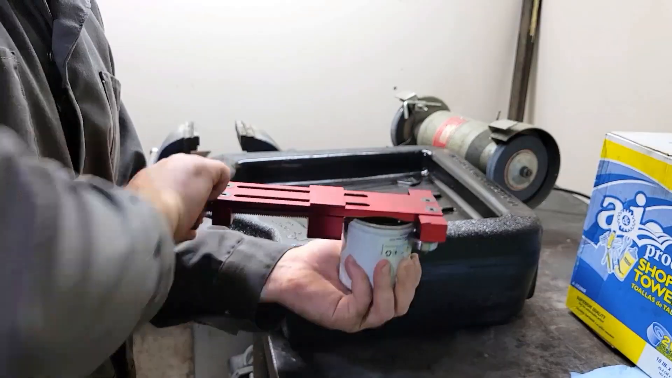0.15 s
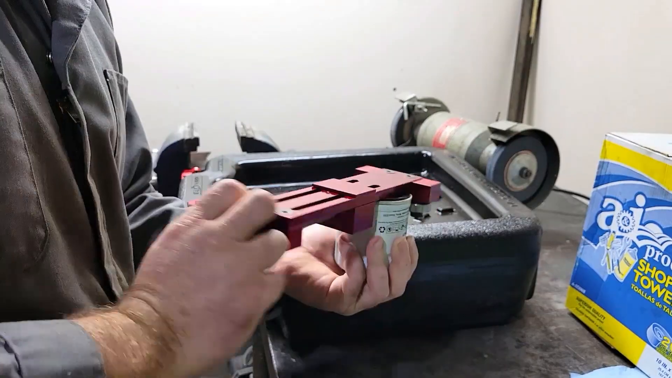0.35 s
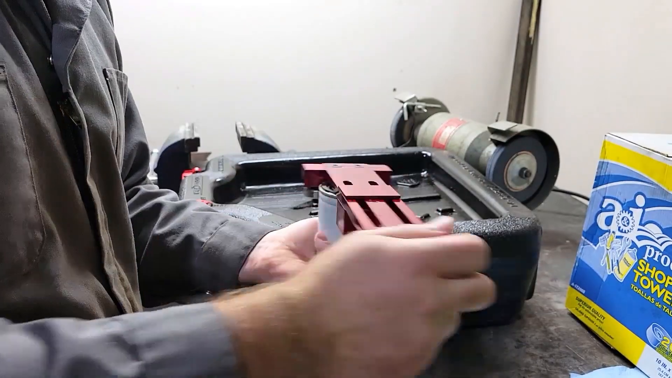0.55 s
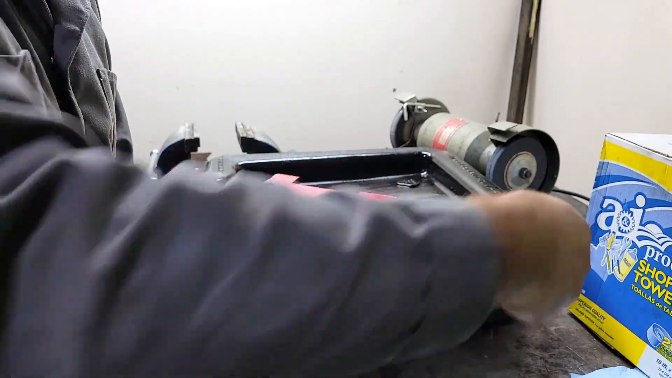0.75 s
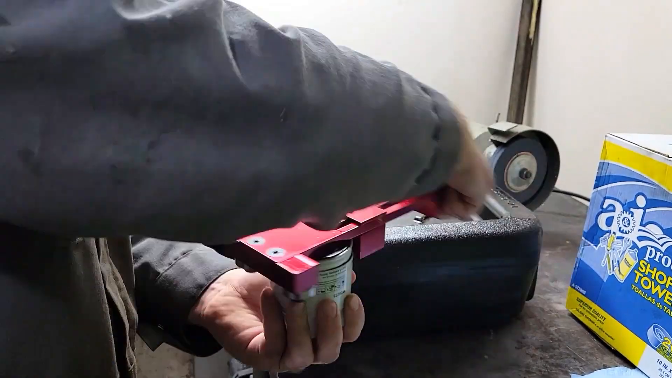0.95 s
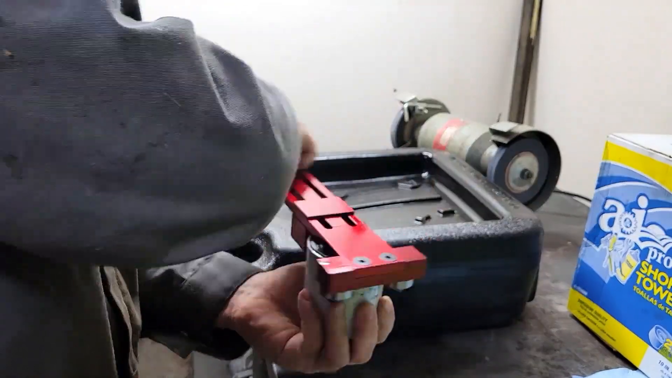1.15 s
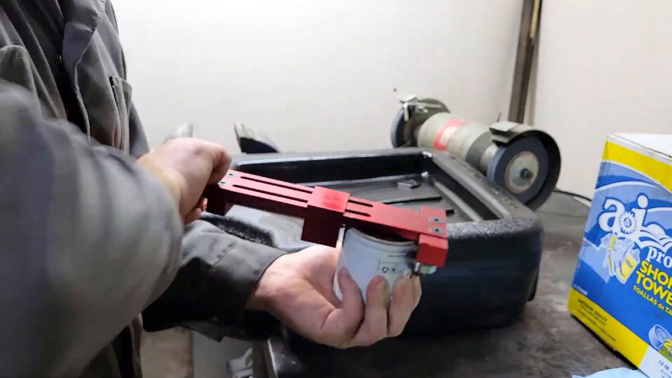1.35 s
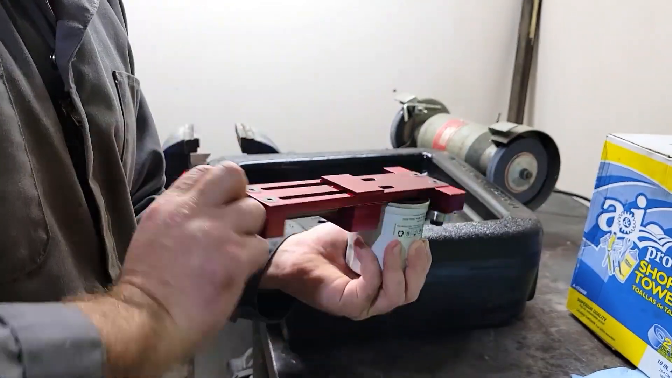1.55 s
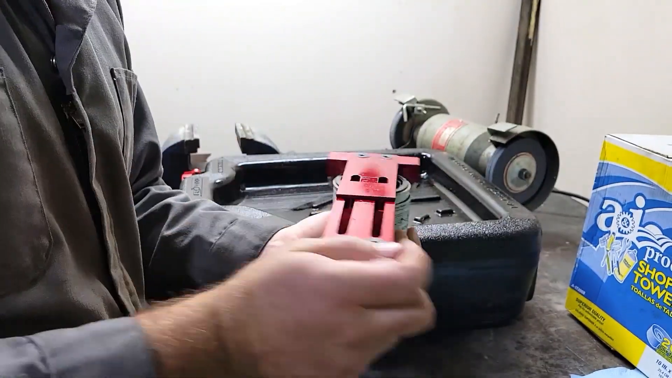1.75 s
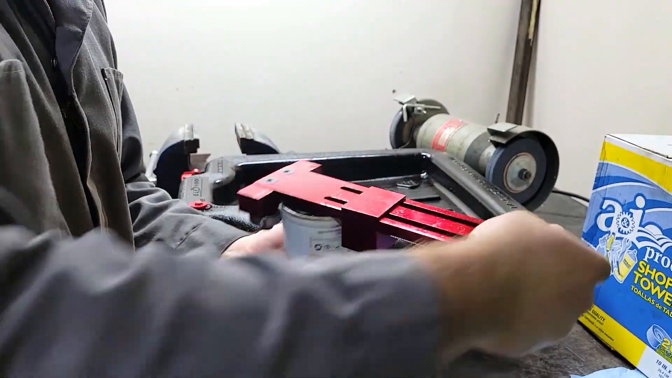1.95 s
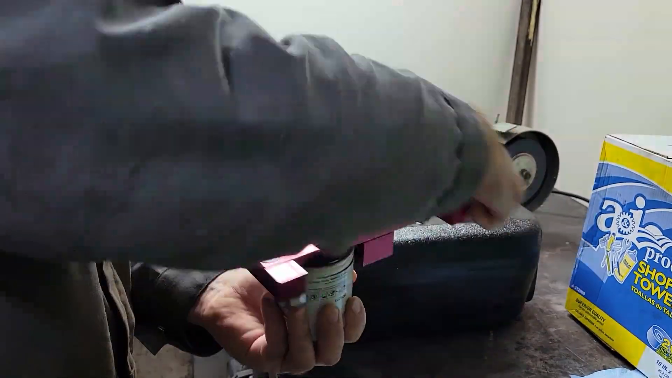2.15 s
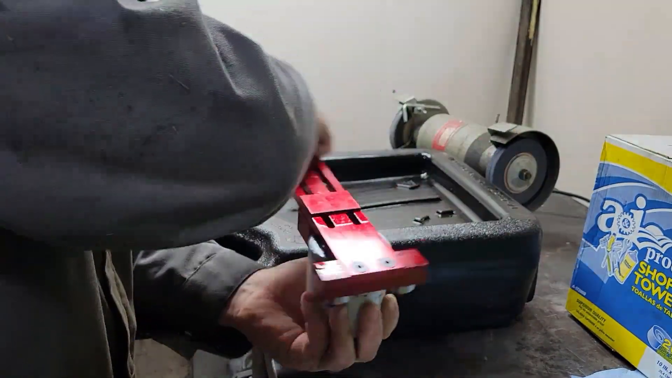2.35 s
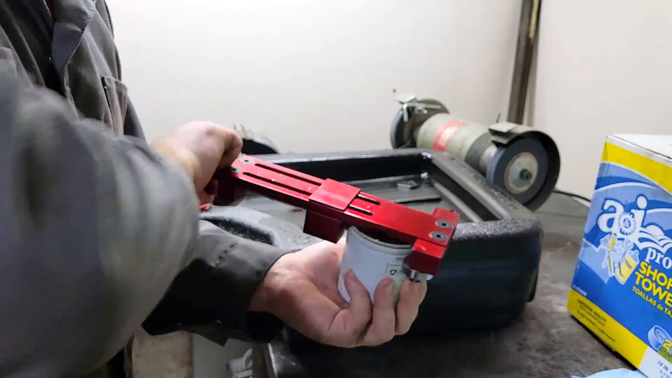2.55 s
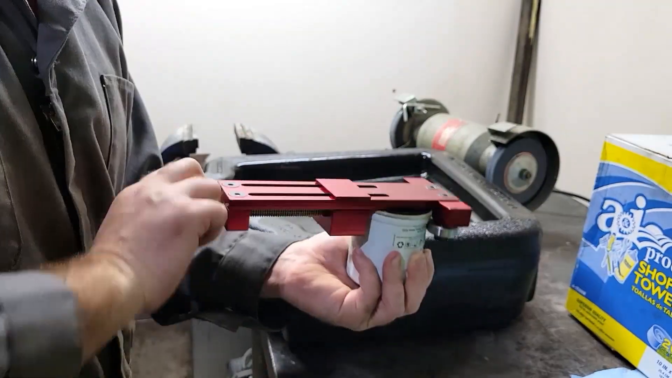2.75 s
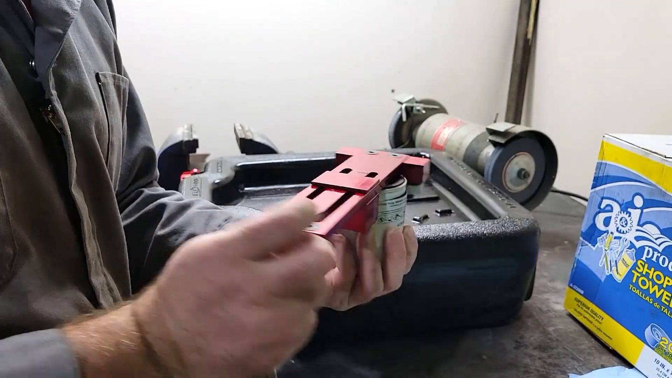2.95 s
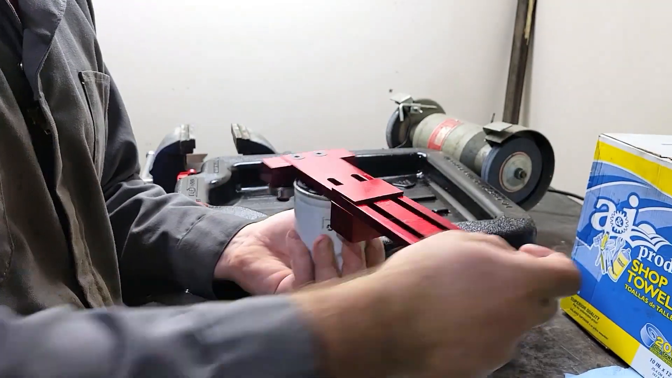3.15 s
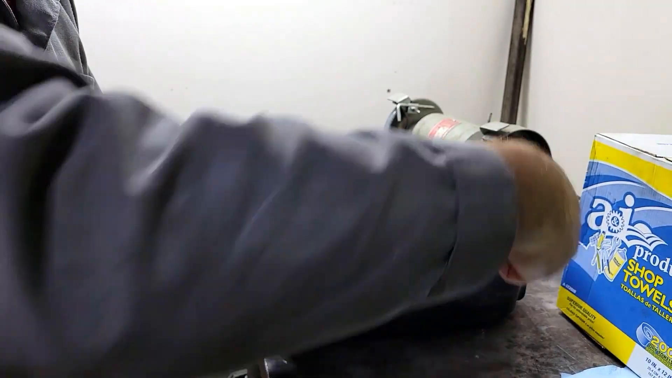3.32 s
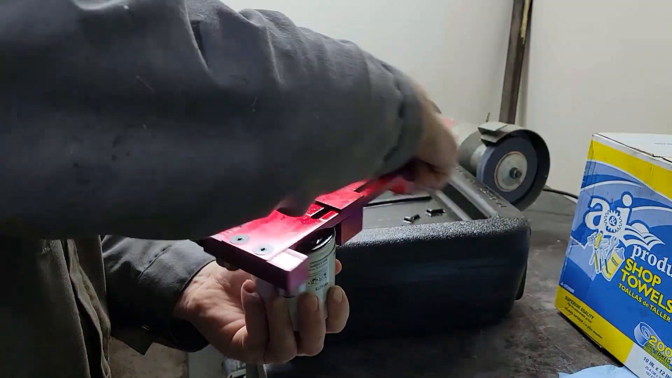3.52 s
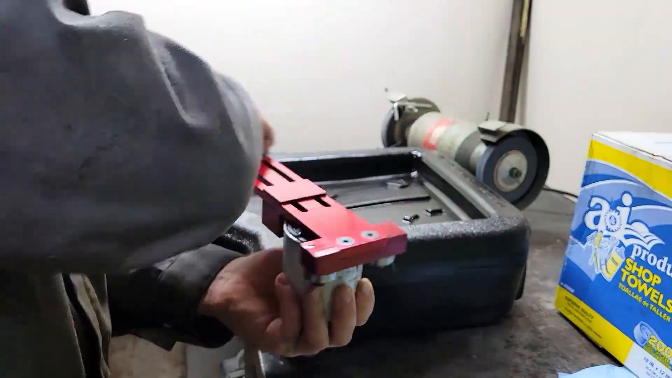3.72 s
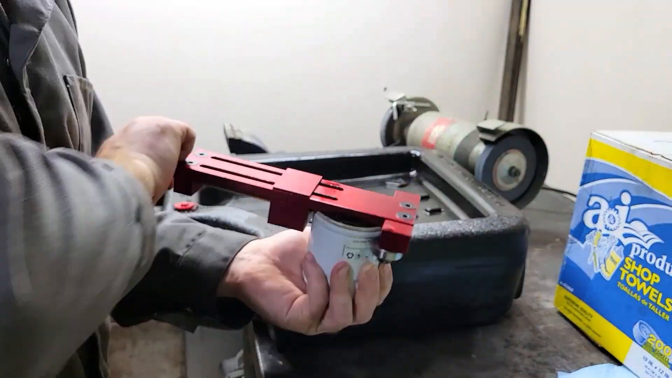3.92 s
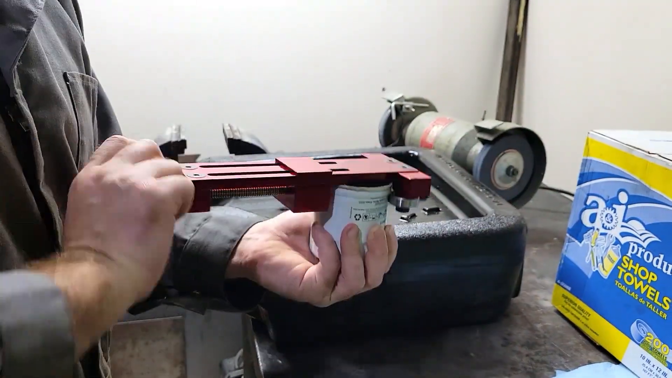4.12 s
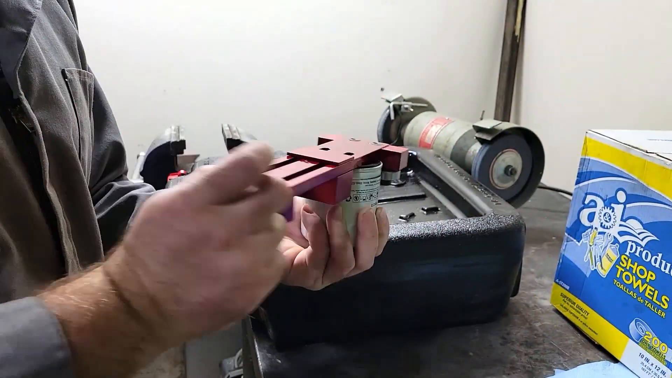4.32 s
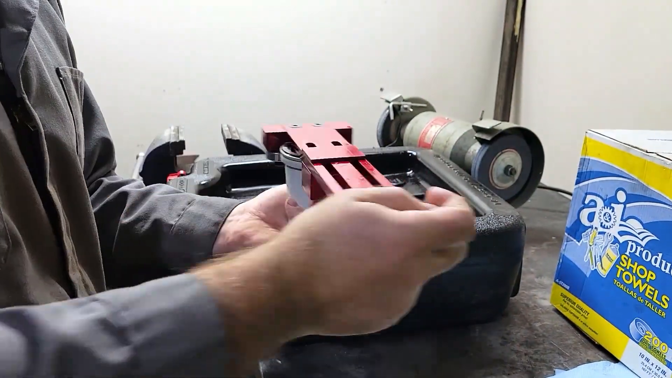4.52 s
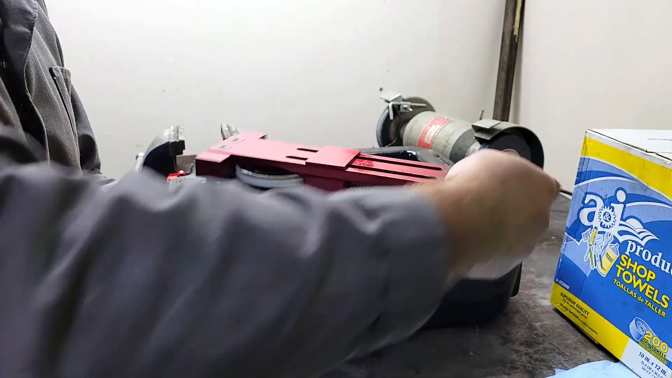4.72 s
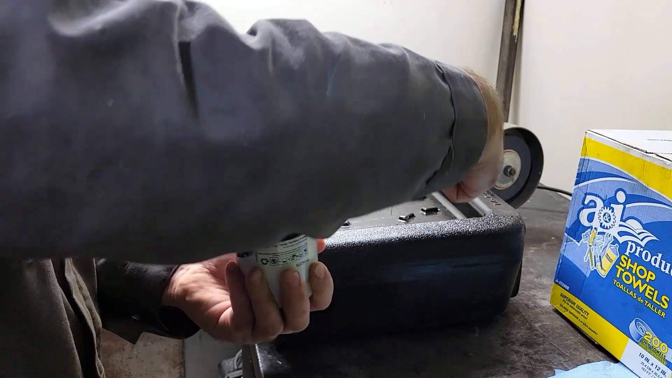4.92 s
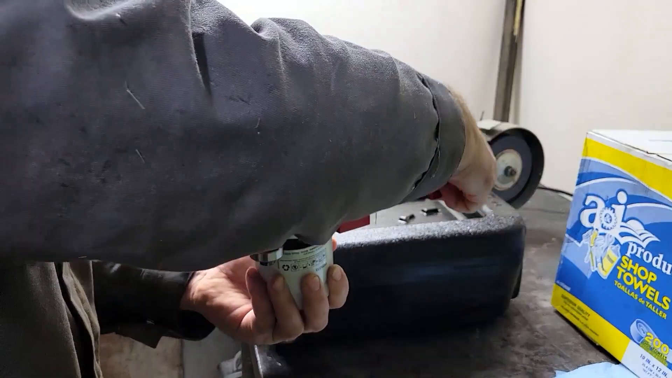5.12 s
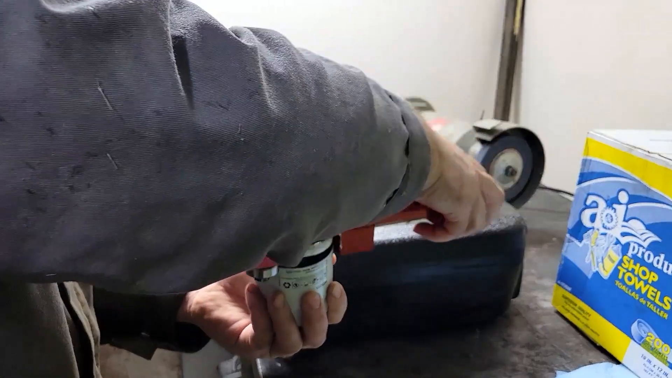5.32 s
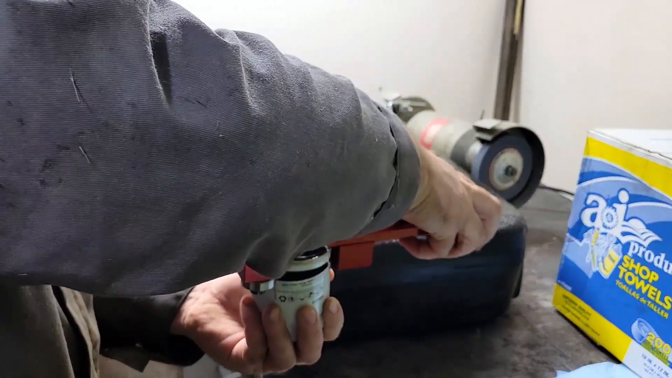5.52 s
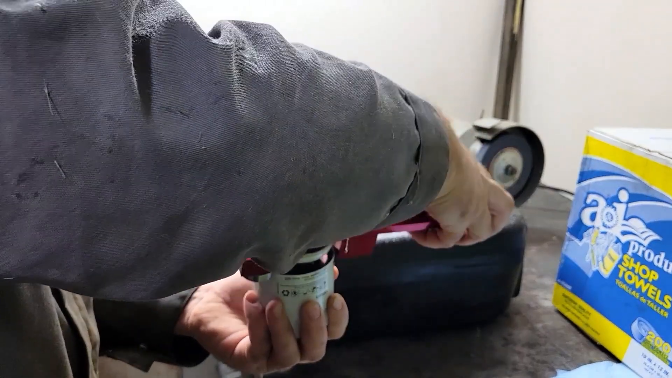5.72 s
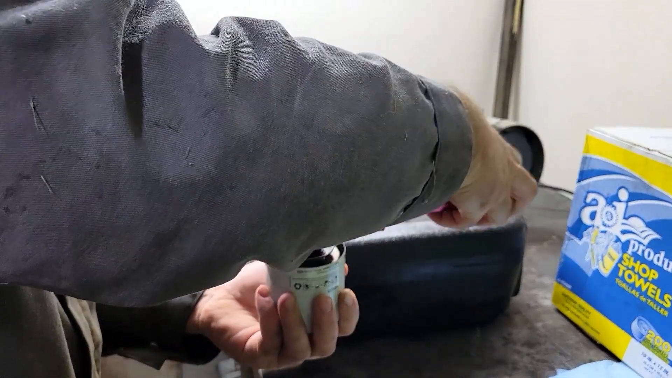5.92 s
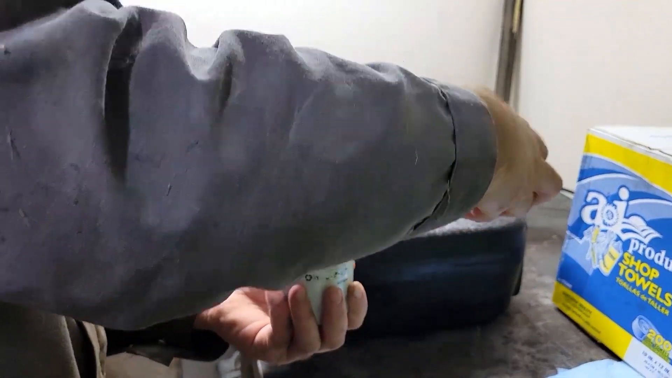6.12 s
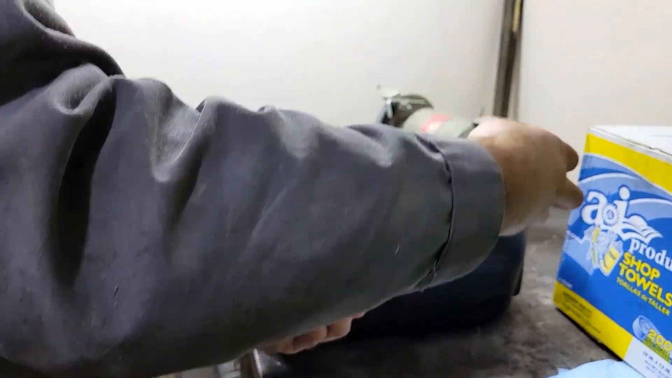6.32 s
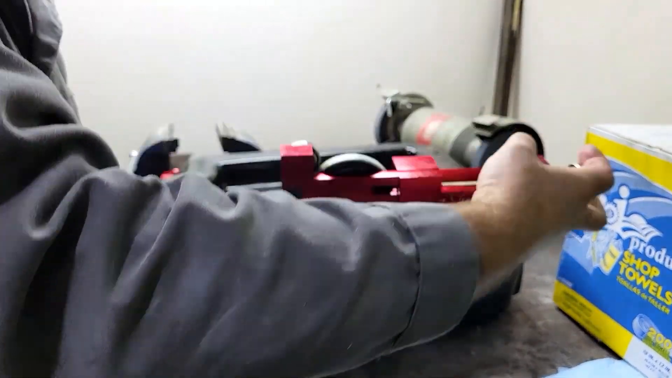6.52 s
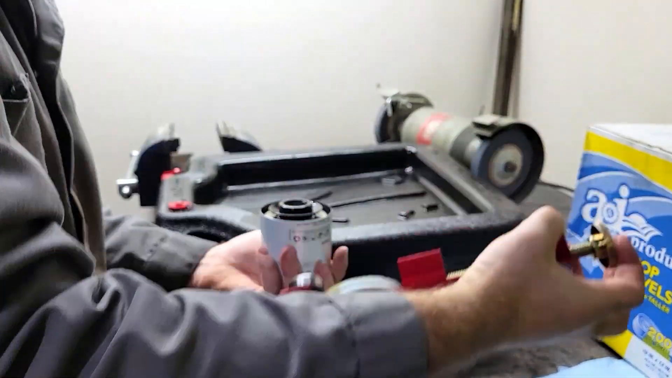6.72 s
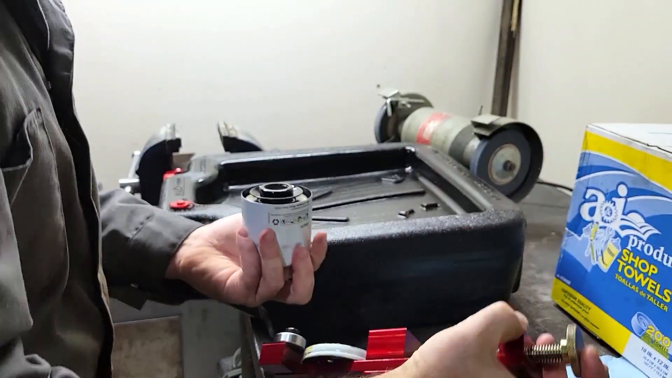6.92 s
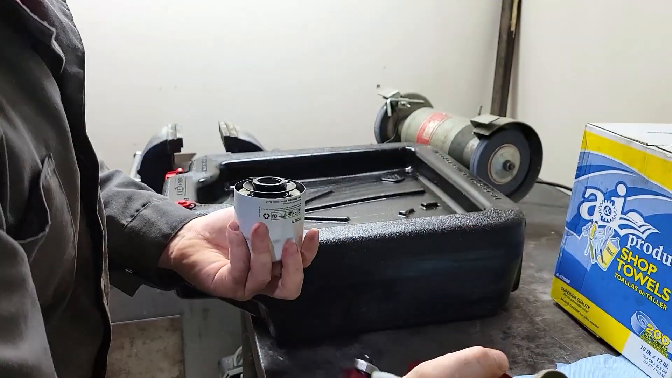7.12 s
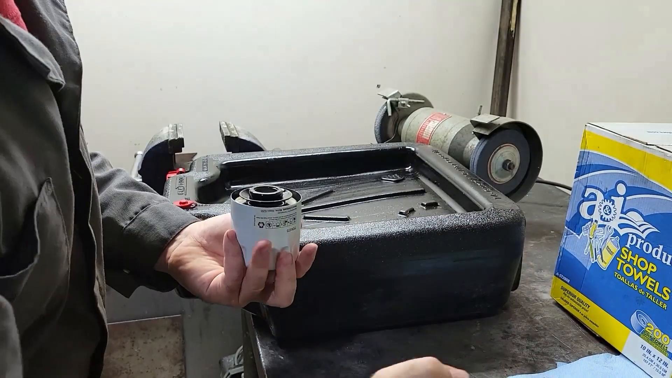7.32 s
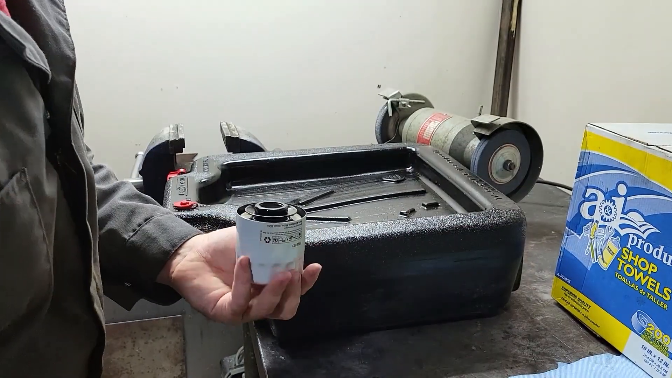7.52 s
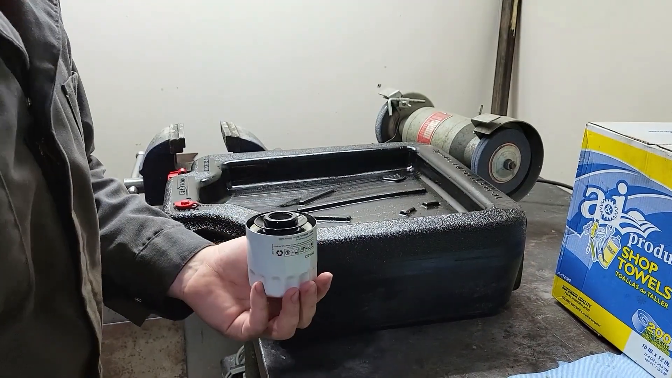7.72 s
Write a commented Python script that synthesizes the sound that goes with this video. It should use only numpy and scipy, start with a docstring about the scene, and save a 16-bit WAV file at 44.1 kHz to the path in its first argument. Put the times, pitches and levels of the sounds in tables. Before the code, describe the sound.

Close in a small hard-walled garage, a hand-turned cutter rolls around a steel filter can. Faint gritty rubbing runs between sharp, irregular metallic snaps, dull can pops and light clacks of loose parts. A brief scrape sings on the loosening lid near five seconds, then it quiets. Finally the tool booms and clatters onto the workbench carrying the microphone, rocking several times over low hum and hiss.

```python
"""A hand-turned cutter opens a steel oil filter in a small garage, over a low hum, rumble and hiss.
The tail of an earlier snap dies away; then the wheel rolls and its seam crackles and snaps, ringing bar and can.
Dull pops of the can and clacks of slack parts fall between the snaps, and the loosening lid scrapes.
Last, the tool touches, lands and rocks on the workbench that carries the microphone. Struck and rubbed bodies
are damped modes and coloured noise; a decaying noise tail is the hard-walled room."""
import sys
import numpy as np
from scipy import signal
from scipy.fft import rfft, irfft, next_fast_len
from scipy.io import wavfile
from scipy.ndimage import uniform_filter1d

SR = 44100
rng = np.random.default_rng(int(sys.argv[2]) if len(sys.argv) > 2 else 0)


def pcm_store(signal):
    """Save signal as 16-bit PCM."""
    levels = np.round(np.clip(np.atleast_2d(signal), -1, 1) * 32767)
    wavfile.write(sys.argv[1], SR, levels.astype(np.int16).T)


N = 346626
TIME = np.arange(N) / SR
RING_TIME = np.arange(SR * 3 // 4) / SR  # every single ring lasts 0.75 s

# All table levels are relative: each source also has its own mix gain.
# The wheel tears through the seam: (time [s], bar ring [dB], then relative to the bar:
# lid [dB], crack [dB], tick [dB]; left minus right [dB])
SNAPS = [(0.0578, -14.5, -18, -4, -2, -5.5), (0.4493, -22.5, -47, -4.5, -2.5, -2.5),
         (0.508, -31, -34, -4, 3, -4), (0.5237, -22.5, -42, 2.5, 7, -4.5), (0.613, -8.5, -31, -7, -2, -2),
         (1.5785, -39, -20.5, -1.5, -15, -1.5), (1.6832, -38, -24, -0.5, -19.5, -3.5),
         (1.7183, -30, -26, -1.5, -2.5, -1.5), (1.7608, -21, -44, 0, -1.5, -1.5),
         (1.8429, -9, -51.5, -8, -6.5, -1), (2.0257, -22.5, -1, 0.5, 11, 1.5),
         (2.9936, -33.5, -28, -4, -18, -4), (3.01, -18, -40, -4.5, -7.5, -1),
         (3.044, -13, -40.5, -8, -9.5, -1), (3.8644, -35.5, -21.5, -7, 1.5, -4),
         (3.8749, -37, -8, 2, 6, -1.5), (3.8949, -37, -22, -2.5, 4, -1.5),
         (3.9443, -39, -11.5, 0, 8.5, 1.5), (3.959, -33.5, -32.5, -8, -7, -2),
         (3.9835, -34.5, -28, -4.5, -7, 0), (4.2326, -12.5, -24.5, -6, -6.5, -2.5),
         (4.3937, -39, -36, 4.5, 3.5, -6), (4.7156, -15, -7.5, -1.5, -4, -2),
         (4.9771, -29.5, -7, -5, -11.5, -9), (5.8765, -48.5, -10, -3.5, -4, -15.5)]
# The can buckles with a dull pop: (time [s], bar ring [dB], can wall relative to it [dB], left minus right [dB])
POPS = [(0.8662, -38, -5.5, -7.5), (1.1187, -16.5, -9.5, -1.5), (2.1164, -25.5, -13.5, 2),
        (2.3724, -22.5, 0.5, 15), (3.731, -23, -1.5, 8.5), (4.0426, -35, 1, -4.5), (4.6678, -41.5, 8, -3)]
POP_LID_DB, POP_CRACK_DB, POP_TICK_DB = -6.5, -15.5, -41  # relative to the bar
# Slack parts of the cutter clack: (time [s], bar ring [dB], left minus right [dB])
CLACKS = [(0.3471, -33, -3), (1.3653, -42.5, -8), (2.575, -41, -5), (2.7325, -33.5, -5),
          (3.3831, -45.5, -4), (4.447, -39.5, -5.5), (4.6198, -33.5, -2), (5.2079, -41.5, 10.5),
          (5.3621, -51, 7), (5.476, -52, 2), (5.5801, -32.5, 8.5), (5.664, -44, -2)]
CLACK_LID_DB, CLACK_WALL_DB, CLACK_CRACK_DB, CLACK_TICK_DB = -13.5, -13.5, -8, -25.5  # relative to the bar
WALL_DB, WALL_FOLLOWS = -2.5, 0.48  # can wall in a snap: level at lid 0 dB, and dB gained per dB of lid
# The wheel rebounds once after each blow: typical delay, spread of its logarithm, level
REBOUND_S, REBOUND_JITTER, REBOUND_DB = 0.011, 0.21, -13

# Modes before pitch ratio, detuning and added damping.
# The cutter's bar and roller plate: (frequency [Hz], level [dB], t60 [s])
BAR_MODES = [(1867, -2, 0.0087), (2450, -2.5, 0.013), (2570, -10.5, 0.056), (2910, -4.5, 0.033),
             (2870, 4.5, 0.0083), (3153, 3, 0.038), (2684, -22, 0.51), (2940, -21.5, 0.13),
             (3680, -5.5, .02)]
# The can's wall, damped by the hand: (frequency [Hz], level [dB], t60 [s])
WALL_MODES = [(820, -2, 0.036), (916, -7.5, 0.16), (1094.6, 5.5, 0.01), (1246, -11, 0.063),
              (1460, -10.5, 0.042), (1627, -5.5, 0.083)]
# The can's lid: (frequency [Hz], level [dB], t60 [s])
LID_MODES = [(364, -10.5, 0.047), (439.8, -5, 0.014), (504, -10, 0.5), (561, -12, 0.36), (660, 6.5, 0.0097),
             (717, -16, 0.35)]
# The lid rings higher and shorter as it is cut loose: (time [s], pitch ratio, t60 of the added damping [s])
LID_STATE = [(0, 1.03, 2.7), (3.802, 1.033, 1.6), (4.7, 1.18, 0.17), (5.9, 1.58, 0.22)]
# Tearing steel: (frequency [Hz], level [dB])
CRACK_COLOUR = [(150, -20), (1200, -18), (2500, -12.5), (3800, 5), (5300, 1.5), (7000, -8), (9000, -15),
                (16000, -34)]
# The sharpest edge of the tear: (frequency [Hz], level [dB])
TICK_COLOUR = [(3000, -21.5), (7000, -0.5), (8800, -7.5), (10200, -8.5), (12000, -1), (15700, -5.5),
               (17000, -12.5)]

# Steel drags on the rim: (start [s], end [s], then at the end: lid [dB], bar [dB], grit [dB];
# swell over its length [dB], pitch ratio)
SCRAPES = [(3.19, 3.315, -54.5, -52, -48.5, 10, 0.96), (4.232, 4.417, -74, -48.5, -43.5, -10.5, 0.98),
           (4.764, 4.928, -28.5, -24, -32.5, 13.5, 0.94), (5.697, 5.85, -49.5, -55, -53, 17.5, 1.05)]
SCRAPE_ATTACK_S, SCRAPE_RELEASE_DB_PER_S = 0.0089, 327.5
# The loose lid's response to rubbing: (frequency [Hz], level [dB])
LOOSE_LID_COLOUR = [(150, -28), (330, -12), (500, -5.5), (610, 0), (700, 7.5), (820, 2), (1050, -16),
                    (1400, -9), (2200, -26.5), (6000, -70.5)]
# The bar's response to rubbing: (frequency [Hz], level [dB])
RUBBED_BAR_COLOUR = [(900, -38), (1800, -3.5), (2400, 0), (2800, -5.5), (3050, 10), (3400, -6.5),
                     (6000, -31)]
# Narrow lid modes that the drag keeps singing: (frequency [Hz], level [dB], t60 [s])
LID_SINGS = [(705, -12, 0.1), (690, -12, 0.1006), (687, -1.5, 0.25)]
# Narrow bar modes that the drag keeps singing: (frequency [Hz], level [dB], t60 [s])
BAR_SINGS = [(2205, -6.5, 0.13), (2597, -3.5, 0.13), (2800, -1, 0.13)]

# The wheel rubbing along its groove: (frequency [Hz], level [dB])
ROLL_COLOUR = [(150, -2), (400, 0), (750, -4.5), (1200, -7.5), (2200, -4.5), (3100, 1), (3800, -7),
               (6500, -11.5), (9000, -28), (15000, -18)]
ROLL_DB, EASE_S, EASE_DB_PER_S = -56.5, 5.26, 30  # steady effort, then easing off once the lid is loose
FIRST_TAIL_DB, FIRST_TAIL_DB_PER_S = -39.5, 89.5  # the tail of an earlier snap dies away
STRAIN_DB, STRAIN_BUILD_S, STRAIN_RELAX_S = -33.5, 0.025, 0.082  # level relative to the snap

# The tool touches, lands and rocks on the bench: (time [s], thud [dB], clatter [dB])
THUDS = [(6.540, -65.5, -59.5), (6.642, -61.5, -70), (7.283, -6.5, -9), (7.294, -8.5, -25),
         (7.326, -15.5, -40), (7.467, -10.5, -18), (7.501, -12, -24.5), (7.516, -13.5, -19.5),
         (7.562, -23, -29), (7.607, -20.5, -28.5), (7.73, -40, -44), (7.833, -40.5, -44)]
# The bench top's modes: (frequency [Hz], level [dB], t60 [s])
BENCH_MODES = [(82.4, -8, 0.64), (128.4, -4.5, 0.64), (161, -6, 0.42), (204, -1, 0.3), (269, -8.5, 0.38),
               (322, 4.5, 0.21), (385.7, -3, 0.24), (401.2, 3.5, 0.16), (529, 5, 0.095), (638, -1, 0.126),
               (726, -12, 0.36), (1000, -15, 0.27), (1123, 1.5, 0.042), (1650, -7, 0.092)]
# The dense boom of its board: (frequency [Hz], level [dB])
BENCH_COLOUR = [(25, -24), (45, -7), (90, -7.5), (130, -1.5), (400, -3.5), (540, -3), (750, -15),
                (1100, -12.5), (1400, -26), (2500, -40), (5000, -62)]
# The tool's loose parts: (frequency [Hz], level [dB])
CLATTER_COLOUR = [(300, -6), (1000, 7.5), (1750, 2), (2200, -0.5), (3000, 0), (4500, -9), (8000, -23.5),
                  (14000, -25), (17000, -34)]

# Reverberation of the garage: (frequency [Hz], t60 [s], level [dB])
GARAGE = [(115, 0.91, -12.5), (440, 0.73, 2.5), (1310, 0.38, 1.5), (2900, 0.56, -5), (6140, 0.5, -4.5),
          (12000, 0.2, -4.5)]
# Spectrum of the background rumble and hiss: (frequency [Hz], level [dB])
AIR_COLOUR = [(15, -44), (25, -8), (59, -9.5), (120, -11), (175, -24.5), (263, -24.5), (309, -18),
              (439, -42.5), (714, -24.5), (988, -30), (1330, -34.5), (1440, -34), (5430, -44.5),
              (16000, -74)]
AIR_DB = -69
# The hum swells and settles; the hiss swells with it and stays up
HUM_HZ, HUM_DB, HUM_SWELL_DB, HISS_SWELL_DB = 49.6, -74, 8.5, 14
SWELL_START_S, SWELL_RISE_S, SETTLE_END_S, SETTLE_S = 4.9, 0.68, 7.23, 0.71


def undb(db):
    """Decibels to gain."""
    return 10 ** (np.asarray(db) / 20)


def unit(x):
    """Scale to energy 1."""
    return x / np.sqrt(np.sum(x ** 2) + 1e-18)


def fade(t60):
    """Exponential decay of 60 dB in t60 seconds, over the length of one ring."""
    return np.exp(-np.log(1000) * RING_TIME / t60)


def ramp(start, seconds):
    """Rises from 0 to 1 over the given time and stays there."""
    return np.clip((TIME - start) / seconds, 0, 1)


def late(x, seconds):
    """The same ring a moment later, as it reaches the further port."""
    return np.interp(RING_TIME - seconds, RING_TIME, x, left=0)


def pan(left_minus_right_db):
    """Left and right gains that share a level difference equally."""
    return undb(np.array([[left_minus_right_db], [-left_minus_right_db]]) / 2)


def add(out, s, sound):
    """Mix a sound in at time s."""
    start = int(s * SR)
    out[..., start:start + sound.shape[-1]] += sound[..., :N - start]


def colour(x, points):
    """Minimum-phase filter: a (Hz, dB) spectrum that responds as early as it can."""
    size = next_fast_len(2 * x.shape[-1], True) // 2 * 2
    hz, db = np.transpose(points)
    log_hz = np.log(np.arange(size // 2 + 1) * SR / size + 1)
    cepstrum = irfft(np.log(undb(np.interp(log_hz, np.log(hz), db))))
    # folding the cepstrum onto positive times makes the filter causal
    cepstrum[1:size // 2] *= 2
    cepstrum[size // 2 + 1:] = 0
    return irfft(rfft(x, size) * np.exp(rfft(cepstrum)))[..., :x.shape[-1]]


def ring(modes, pitch=0.92, scatter_db=2.0, detune=0.0113):
    """Damped modes, randomly weighted and detuned per contact; little radiates outside their range."""
    out = 0
    for (hz, db, t60), (size, shift, sign) in zip(modes, rng.standard_normal((len(modes), 3))):
        mode_hz = hz * pitch * (1 + detune * shift)
        gain = np.sign(sign) * undb(db + scatter_db * size)
        out = out + gain * fade(t60) * np.cos(2 * np.pi * mode_hz * RING_TIME)
    edges = [0.5 * modes[0][0], 1.25 * pitch * modes[-1][0]]
    return unit(signal.sosfilt(signal.butter(2, edges, "band", fs=SR, output="sos"), out))


def burst(points, t60):
    """A dense cluster of dying modes, made as decaying noise with a given spectrum."""
    return unit(colour(rng.standard_normal(len(RING_TIME)) * fade(t60), points))


def excite(force, points):
    """A body with a (Hz, dB) response driven by a force, at rms 1."""
    return unit(colour(force, points)) * np.sqrt(N)


def grit(rate, spread_db):
    """Random tiny slips at a mean rate per second, a few much stronger than the rest."""
    strength = undb(spread_db * np.minimum(rng.exponential(size=N), 4))
    return (rng.random(N) < rate / SR) * rng.standard_normal(N) * strength


def all_round(x):
    """What a body sends out over all directions: a brief pulse whose spectral notches are filled in."""
    power = uniform_filter1d(np.abs(rfft(x)) ** 2, size=140)
    return np.roll(irfft(np.sqrt(np.abs(power))), 128)[:512]


def blows():
    """Every snap, pop and clack as (time, bar, lid, wall, crack, tick, left minus right), the last six in dB."""
    tears = [(s, db, lid, WALL_DB + WALL_FOLLOWS * lid, crack, tick, pan_db)
             for s, db, lid, crack, tick, pan_db in SNAPS]
    pops = [(s, db, POP_LID_DB, wall, POP_CRACK_DB, POP_TICK_DB, pan_db) for s, db, wall, pan_db in POPS]
    clacks = [(s, db, CLACK_LID_DB, CLACK_WALL_DB, CLACK_CRACK_DB, CLACK_TICK_DB, pan_db)
              for s, db, pan_db in CLACKS]
    return tears + pops + clacks


def cutter_and_can(bar_db=21, lid_db=22, wall_db=20, crack_db=25, tick_db=21,
                   crack_t60=0.023, tick_t60=0.007, rise_s=0.00022, lag_s=0.00003,
                   scatter_db=-7, scatter_t60=0.081, lead_db=-23, lead_s=0.0048, lid_room_db=-3):
    """Each blow rings bar, lid and wall; returns the near stereo sound and the mono sound sent to the room."""
    near, to_room = np.zeros((2, N)), np.zeros(N)
    when, *lid_state = np.transpose(LID_STATE)
    for s, db, lid, wall, crack, tick, pan_db in blows():
        bar_ring = undb(bar_db) * ring(BAR_MODES, pitch=0.97, scatter_db=1.85, detune=0.012)
        wall_ring = undb(wall_db + wall) * ring(WALL_MODES, scatter_db=1.0, detune=0.016)
        tear = undb(crack_db + crack) * burst(CRACK_COLOUR, crack_t60)
        # the tear takes a moment to run
        body = (bar_ring + wall_ring + tear) * (1 - np.exp(-RING_TIME / rise_s))
        body = undb(db) * (body + undb(tick_db + tick) * burst(TICK_COLOUR, tick_t60))

        pitch, held_t60 = (np.interp(s, when, column) for column in lid_state)
        lid_ring = unit(ring(LID_MODES, pitch, scatter_db=4.0, detune=0.0069) * fade(held_t60))
        drum = undb(db + lid_db + lid) * lid_ring

        # arm, tray and bench scatter it differently at each angle of the tool
        spread = all_round(body)
        echoes = [unit(noise * fade(scatter_t60)) for noise in rng.standard_normal((2, len(RING_TIME)))]
        scatter = np.array([signal.fftconvolve(echo, spread)[:len(RING_TIME)] for echo in echoes])
        direct = np.array([body, late(body, lag_s)])
        add(near, s, pan(pan_db) * (drum + direct + undb(scatter_db) * scatter))
        add(near, s - lead_s, undb(lead_db) * body)  # a faint copy of the blow comes just before it
        rebound_s = REBOUND_S * np.exp(REBOUND_JITTER * rng.standard_normal())
        add(near, s + rebound_s, undb(REBOUND_DB) * body)
        add(to_room, s, spread)
        # only the first part of the lid's ring feeds the room
        add(to_room, s, undb(lid_room_db) * drum * fade(0.18))
    return near, to_room


def scrapes(slip_hz=85, uneven=0.25, slip_t60=0.034, lid_db=-4, bar_db=-5, grit_db=-4, sing_db=-7):
    """Stick and slip: uneven bunches of grit drive lid and bar; each drag swells or sinks, then lets go."""
    slips = np.zeros(N)
    times = np.cumsum(np.exp(uneven * rng.standard_normal(1200))) / slip_hz
    slips[(times[times < N / SR] * SR).astype(int)] = 1
    slips = slips * undb(2 * rng.standard_normal(N))
    force = grit(5000, 2.7) * signal.fftconvolve(slips, fade(slip_t60))[:N]
    rubbed_lid = excite(force, LOOSE_LID_COLOUR)
    rubbed_bar = excite(force, RUBBED_BAR_COLOUR)
    gritty = excite(force, CRACK_COLOUR)

    def song(modes, pitch):
        """Narrow modes kept ringing by the rubbing force."""
        sung = signal.fftconvolve(force, ring(modes, pitch, scatter_db=1, detune=0))[:N]
        return undb(sing_db) * unit(sung) * np.sqrt(N)

    out = 0
    for start, end, lid, bar, rough, swell, pitch in SCRAPES:
        swell_db = swell * (ramp(start, end - start) - 1)
        release_db = SCRAPE_RELEASE_DB_PER_S * np.clip(TIME - end, 0, 1)
        pressure = ramp(start, SCRAPE_ATTACK_S) * undb(swell_db - release_db)
        lid_sound = undb(lid_db + lid) * (rubbed_lid + song(LID_SINGS, pitch))
        bar_sound = undb(bar_db + bar) * (rubbed_bar + song(BAR_SINGS, pitch))
        out = out + pressure * (lid_sound + bar_sound + undb(grit_db + rough) * gritty)
    return out


def rolling(roll_db=-4, crackle_hz=110, crackle_db=-30, crackle_tick_db=-4, crackle_build_s=0.034):
    """Grit rubs along the groove, with burrs; it grinds harder around each snap, and the seam crackles before it."""
    force = grit(7000, 2.2) + 6 * grit(16, 1.5)  # fine rubbing, and now and then a burr
    steady = undb(ROLL_DB - EASE_DB_PER_S * np.maximum(TIME - EASE_S, 0))
    effort = steady + undb(FIRST_TAIL_DB - FIRST_TAIL_DB_PER_S * TIME)
    yielding = np.zeros(N)
    for s, db, lid, crack, *_ in SNAPS:
        strain = np.exp(-np.maximum((s - TIME) / STRAIN_BUILD_S, (TIME - s) / STRAIN_RELAX_S))
        effort = np.maximum(effort, undb(db + STRAIN_DB) * strain)
        build = (TIME < s) * np.exp(-np.abs(TIME - s) / crackle_build_s)
        yielding += undb(db + crack + crackle_db) * build
    cracks = grit(crackle_hz, 1.5)
    crackle = excite(cracks, CRACK_COLOUR) + undb(crackle_tick_db) * excite(cracks, TICK_COLOUR)
    return excite(force, ROLL_COLOUR) * effort * undb(roll_db) + yielding * crackle


def bench(modes_db=26, board_db=24, clatter_db=20, clack_db=17,
          board_t60=0.29, clatter_t60=0.43, clack_t60=0.021, lag_s=0.00025, pan_db=-2.0):
    """The dropped tool booms the bench top to the right of the microphone, clacks, and its parts clatter."""
    out = np.zeros((2, N))
    for s, thud, clatter in THUDS:
        boom = undb(modes_db) * ring(BENCH_MODES, pitch=0.99, scatter_db=3.5, detune=0.0065)
        boom = boom + undb(board_db) * burst(BENCH_COLOUR, board_t60)
        rattle = np.array([undb(clatter_db) * burst(CLATTER_COLOUR, clatter_t60)
                           + undb(clack_db) * burst(CLATTER_COLOUR, clack_t60) for _ in range(2)])
        add(out, s, undb(thud) * np.array([late(boom, lag_s), boom]) + undb(clatter) * rattle)
    return out * pan(pan_db)


def garage(x, gap_s=0.0012):
    """A diffuse stereo tail from the hard walls: noise bands that each die at their own rate."""
    hz, t60, db = np.transpose(GARAGE)
    noise = rfft(rng.standard_normal((2, len(RING_TIME))))
    log_hz = np.log(np.arange(noise.shape[-1]) * SR / len(RING_TIME) + 1)
    onset = np.clip(RING_TIME / gap_s - 1, 0, 1)  # silent for one gap, then rising over another
    tail = 0
    for k, share in enumerate(np.eye(len(hz))):  # neighbouring bands crossfade
        band = irfft(noise * np.interp(log_hz, np.log(hz), share), len(RING_TIME))
        tail = tail + undb(db[k]) * band * unit(fade(t60[k]) * onset)
    return signal.fftconvolve(x[None], tail, axes=1)[:, :N]


def background(waver=0.18, rumble_db=-2, hiss_db=-11):
    """A low noise rumble shared by both ports, a separate hiss in each and a wavering sine hum."""
    rumble, left, right = (excite(noise, AIR_COLOUR) for noise in rng.standard_normal((3, N)))
    treble = signal.butter(2, 400, "high", fs=SR, output="sos")
    hiss = unit(signal.sosfilt(treble, [left, right])) * np.sqrt(2 * N)
    wavering = 1 + waver * np.interp(np.linspace(0, 39, N), np.arange(40), rng.standard_normal(40))
    hum = np.sqrt(2) * wavering * np.sin(2 * np.pi * HUM_HZ * TIME)
    swell = ramp(SWELL_START_S, SWELL_RISE_S)
    settle = ramp(SETTLE_END_S - SETTLE_S, SETTLE_S)
    hum_db = HUM_DB + HUM_SWELL_DB * (swell - settle)
    air = undb(rumble_db) * rumble + undb(hiss_db + HISS_SWELL_DB * swell) * hiss
    return undb(AIR_DB) * air + undb(hum_db) * hum


def scene():
    """Cutter, can and bench in the garage."""
    near, to_room = cutter_and_can()
    friction = scrapes() + rolling()
    drop = bench()
    reverb = garage(to_room + undb(3.5) * friction + undb(-11) * drop.mean(axis=0))
    return near + undb(-3.0) * friction + drop + reverb + background()


def record(dry):
    """The microphone sheds the deepest bass, peaks clip at full scale, and the top is cut."""
    thin = signal.sosfilt(signal.butter(4, 34, "high", fs=SR, output="sos"), dry)
    top_cut = signal.ellip(8, 0.2, 70, 16150, fs=SR, output="sos")
    return signal.sosfilt(top_cut, np.clip(thin, -1, 1))


dry = scene()
out = record(dry)
pcm_store(out)
```